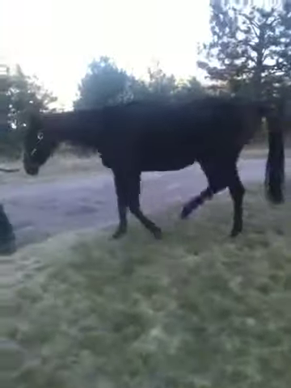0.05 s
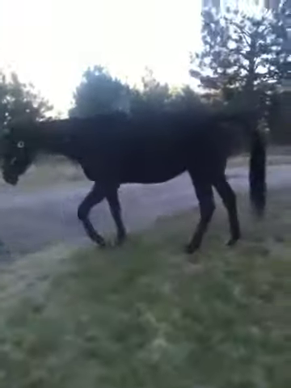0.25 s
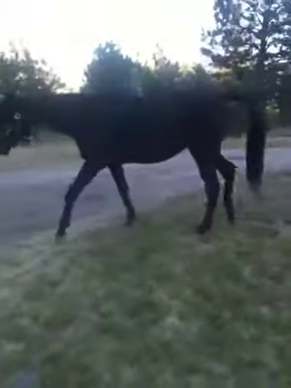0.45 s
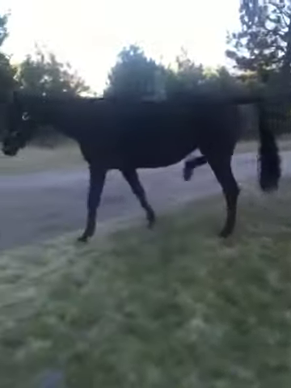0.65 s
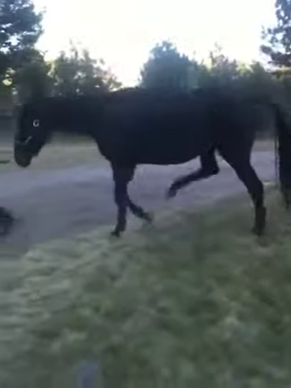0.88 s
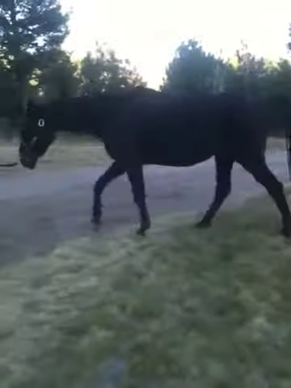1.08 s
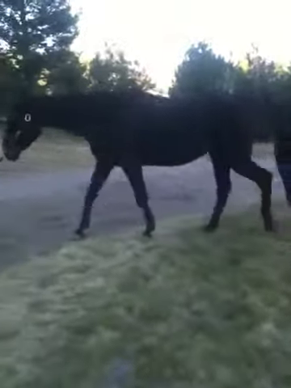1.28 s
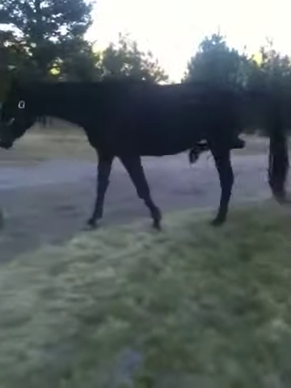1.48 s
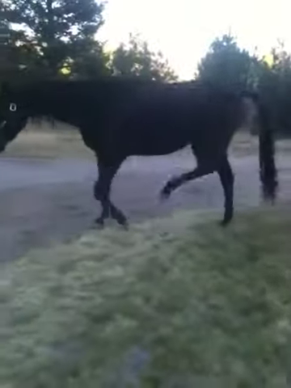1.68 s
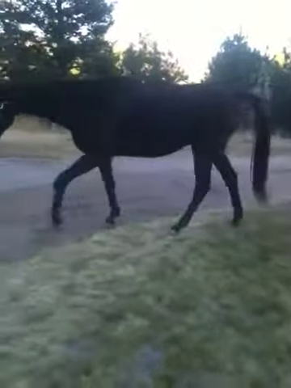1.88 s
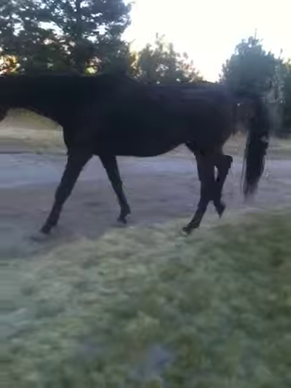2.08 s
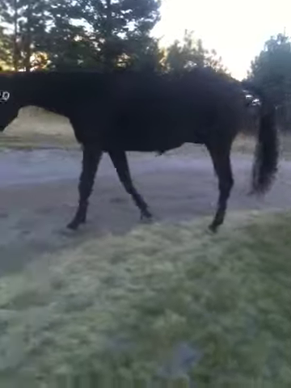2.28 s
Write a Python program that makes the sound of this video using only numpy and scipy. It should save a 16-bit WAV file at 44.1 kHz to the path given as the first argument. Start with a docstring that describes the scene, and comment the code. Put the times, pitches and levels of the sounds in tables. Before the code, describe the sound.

Dull handling bumps and creaks on the microphone, with a horse's faint hoof steps on dirt.

```python
"""Horse on a dirt track

A horse walks by a few metres from the microphone, its hooves crunching faintly in the dirt.
Much closer, the hand holding the camera bumps and creaks on the case, which gives a dull low ring.
Under it lie light wind, microphone hiss, a thin electrical whine and tiny regular ticks."""
import sys
import numpy as np
from scipy import signal
from scipy.fft import rfft, irfft
from scipy.io import wavfile
from scipy.ndimage import uniform_filter1d

SR = 44100
rng = np.random.default_rng(int(sys.argv[2]) if len(sys.argv) > 2 else 0)


def wrap_up_sound(samples):
    """Save the sound to the file named by the first command line argument, as 16-bit audio."""
    columns = np.atleast_2d(samples).T
    # keep every value between -1 and 1, then stretch to whole-number steps
    tamed = np.clip(columns, -1, 1)
    steps = np.round(tamed * 32767).astype(np.int16)
    wavfile.write(sys.argv[1], SR, steps)


N = 108045

# Hoof falls, scuffs and kicked grit on the track, a few metres off. Each row: time of the peak and
# decay time in seconds, thud level and grit level in dB, treble edge of the grit in Hz.
HOOF_FALLS = [(0.5811, 0.0012, -50, -53, 1720), (.5878, 0.0012, -42, -59, 2700),
              (0.81, 0.022, -73.5, -78, 3500), (0.852, 0.021, -93, -76.5, 4500),
              (0.937, 0.0091, -69, -75, 3550), (1.257, .004, -63, -67, 5000),
              (1.272, 0.0086, -69, -66.5, 4500), (1.278, .03, -75.5, -77, 4530),
              (1.485, 0.0063, -66.5, -69.5, 4500), (1.501, 0.015, -73, -76, 4500),
              (1.579, 0.0023, -64, -71, 3000), (1.876, 0.0082, -61.5, -67.5, 5560),
              (1.942, 0.0066, -78, -70, 4000), (2.138, 0.0051, -65.5, -68, 4500),
              (2.149, 0.0081, -53.5, -71.5, 4000), (2.23, 0.0035, -77, -64, 4000)]
# The hollow thud and the loose grit underfoot. Each row: frequency in Hz, relative level in dB.
THUD_SPECTRUM = [(100, -23), (180, 0), (290, 5), (400, -8), (540, 0.5), (700, 3), (950, -19), (1250, -5.5),
                 (1900, -31.5), (4000, -42)]
GRIT_SPECTRUM = [(400, 14), (1300, 2.5), (2800, 2), (4500, 0.5), (7000, -5.5), (14000, -13)]


def hooves(grain_samples=32, grain_spread_db=6, earth_hz=262, earth_db=-1.5, rise_share=0.86):
    """Each hoof presses into the dirt: the packed earth thuds and rings, and uneven grains crunch."""
    t, out = np.arange(N) / SR, np.zeros(N)
    grain_sizes = undb(grain_spread_db * rng.standard_normal(N // grain_samples + 1))
    grains = np.repeat(grain_sizes, grain_samples)[:N]
    thud = colour(rng.standard_normal(N), THUD_SPECTRUM)
    crunch = colour(grains * rng.standard_normal(N), GRIT_SPECTRUM)
    earth_ring = undb(earth_db) * np.sin(2 * np.pi * earth_hz * t)
    for at, decay_s, thud_db, grit_db, edge_hz in HOOF_FALLS:
        age = (t - at) / decay_s
        press = np.exp(-np.where(age < 0, age / rise_share, age) ** 2)
        out += press * (undb(thud_db) * (thud + earth_ring) + undb(grit_db) * dull(crunch, edge_hz))
    return out


# Sharp clicks out on the track, likely stones struck by a hoof.
# Each row: start in seconds, peak level in dB, centre frequency in Hz.
STONE_CLICKS = [(.5876, -54, 1640), (1.8761, -57, 4160), (2.2312, -64, 2600)]


def stones(width_octaves=0.97):
    """A hard contact gives one very short, dry click."""
    out, half_band = np.zeros(N), 2 ** (width_octaves / 2)
    for at, db, hz in STONE_CLICKS:
        band = signal.butter(2, [hz / half_band, hz * half_band], "band", fs=SR, output="sos")
        click = signal.sosfilt(band, signal.unit_impulse(512))
        add(out, undb(db) * click / np.abs(click).max(), at)
    return out


CASE_LOW_HZ, CASE_UPPER_HZ = 146.2, 214.7  # the usual resonances of the camera case


def case_ring(upper_hz, edge_hz):
    """A push rings two damped resonances of the case; soft skin takes the treble off. Peak 1."""
    s = 1j * np.fft.rfftfreq(2048, 1 / SR)

    def pole(hz, q):
        return 1 / (1 + s / (hz * q) + (s / hz) ** 2)

    low_hz = CASE_LOW_HZ * (upper_hz / CASE_UPPER_HZ) ** 0.73  # partly follows the upper ring
    case = -s ** 2 * pole(low_hz, q=2.43) * pole(upper_hz, q=2.48)
    skin = pole(edge_hz, q=0.88) ** 2
    ring = irfft(case * skin)
    return ring / np.abs(ring).max()


# Knocks of the hand, right at the microphone.
# Each row: start in seconds, peak level in dB, upper ring and treble edge in Hz.
HAND_BUMPS = [(0.0409, -54, 280, 684), (0.3677, -30, 196, 400), (.5800, -30, 264, 640),
              (0.5862, -32, 188, 580), (0.5939, -31, 180, 397), (0.8631, -38.5, 205, 425),
              (0.908, -35, 254, 414), (0.9184, -43.5, 202, 440), (0.9385, -35, 230, 463),
              (1.014, -39.5, 208, 475), (1.124, -56, 104, 400), (1.1797, -38, 203, 460),
              (1.2106, -38.5, 287, 1050), (1.336, -43, 203, 410), (1.4114, -35, 224, 418),
              (1.678, -52.5, 198, 650), (1.878, -36.5, 280, 670), (2.3103, -48, 151, 740),
              (2.3906, -49, 154, 744)]


def hand_bumps():
    """Each bump of the hand rings the case once."""
    out = np.zeros(N)
    for at, db, upper_hz, edge_hz in HAND_BUMPS:
        add(out, undb(db) * case_ring(upper_hz, edge_hz), at)
    return out


# The grip shifting on the case, right at the microphone. Each row: start and length in seconds,
# base level in dB, slips per second, upper ring and treble edge in Hz.
GRIP_CREAKS = [(.008, .025, -63.5, 90, 213, 553), (0.106, 0.024, -46.5, 55, 230, 920),
               (0.2, 0.06, -49, 79, 183, 573), (0.24, .019, -39.5, 69.6, 210, 426),
               (.3330, .008, -43.5, 44, 226, 950), (0.348, 0.013, -40, 152, 260, 443),
               (0.398, 0.042, -38.5, 94.6, 213, 496), (0.4452, .018, -45, 111, 233, 580),
               (.468, 0.019, -60, 134, 204, 550), (0.519, 0.015, -37, 102, 184, 434),
               (0.543, 0.032, -30.5, 62, 184, 406), (.625, 0.027, -60.5, 56, 195, 400),
               (0.731, 0.048, -50, 85, 223, 596), (0.882, .025, -48.5, 102, 229, 430),
               (0.9862, 0.024, -45.5, 78, 241, 766), (1.0259, 0.043, -42.5, 73.3, 232, 506),
               (1.0778, 0.051, -56.5, 81, 175, 477), (1.1993, .008, -41.5, 90, 199, 484),
               (1.225, 0.02, -40.5, 112, 211, 640), (1.258, 0.035, -58.5, 88, 190, 500),
               (1.4236, .043, -41.5, 130, 190, 427), (1.59, 0.038, -53.5, 110, 213, 604),
               (1.655, 0.04, -52, 52.7, 241, 760), (1.804, .008, -56, 54, 210, 500),
               (1.84, 0.047, -52, 101, 256, 854), (1.8887, 0.031, -40, 93.5, 220, 870),
               (1.9463, .041, -44, 64, 189, 447), (2.0077, 0.034, -47.5, 75, 216, 654),
               (2.295, 0.045, -50.5, 68, 202, 780), (2.355, 0.015, -56, 80, 168, 650),
               (2.3855, 0.012, -44.5, 168, 230, 890), (2.402, 0.05, -49.5, 108, 238, 650)]


def grip_creaks(max_slips=16, period_jitter=0.0838, spread_db=1.78, catch_db=-11.5):
    """Skin sticks and slips on the case, with a weaker, higher catch between slips."""
    out = np.zeros(N)
    for start, length, base_db, rate, upper_hz, edge_hz in GRIP_CREAKS:
        slip = case_ring(upper_hz, edge_hz)
        catch = undb(catch_db) * case_ring(1.204 * upper_hz, edge_hz)
        age = 0
        for lateness, strength, catch_size, catch_place in rng.standard_normal((max_slips, 4)):
            if age >= length:
                break
            lift_db = 2 - age / length  # sags by 1 dB over the creak
            gain = undb(base_db + lift_db + spread_db * strength)
            add(out, gain * slip, start + age)
            add(out, gain * catch_size * catch, start + age + (catch_place % 1) / rate)
            age += np.exp(period_jitter * lateness) / rate
    return out


def grip_tremor(slips_per_s=85, level_db=-68):
    """Tiny random slips of the hand keep the case faintly ringing."""
    slips = (rng.random(N) < slips_per_s / SR) * rng.standard_normal(N)
    return undb(level_db) * signal.fftconvolve(slips, case_ring(CASE_UPPER_HZ, edge_hz=600))[:N]


# Light wind over the track. Each row: frequency in Hz, relative level in dB.
WIND_SPECTRUM = [(20, -35), (45, -20), (80, 1.5), (180, 1.5), (300, -16), (500, -17), (1000, -29),
                 (2500, -38.5)]


def wind(level_db=-68.5, gust_db=2):
    """A low, gently gusting rush of air."""
    gusts = undb(level_db + gust_db * drift(rate_hz=6.34))
    return gusts * colour(rng.standard_normal(N), WIND_SPECTRUM)


# Radio interference inside the camera.
# Each row: frequency in Hz, starting level in dB, time to fall by 60 dB in milliseconds.
TICK_TONES = [(4100, -77, 0.6), (9300, -59.5, 1.3)]


def interference_ticks(first_s=0.0358, period_s=0.1024):
    """Interference makes tiny regular ticks, each a pair of tones that die at once."""
    age = (np.arange(N) / SR - first_s) % period_s
    out = np.zeros(N)
    for hz, db, t60_ms in TICK_TONES:
        decay = undb(-60 * age * 1000 / t60_ms)
        out += undb(db) * decay * np.sin(2 * np.pi * hz * age)
    return out


def electrical_whine(hz=15000, level_db=-82.5, flips_per_s=60, sharpness=13):
    """A thin, high tone from the electronics keeps flipping its sign."""
    t = np.arange(N) / SR
    flips = np.tanh(sharpness * np.sin(np.pi * flips_per_s * t))
    return np.sqrt(2) * undb(level_db) * flips * np.sin(2 * np.pi * hz * t)


# The noise floor of the microphone. Each row: frequency in Hz, relative level in dB.
HISS_SPECTRUM = [(100, -10.5), (700, 4.5), (1300, 0), (2500, -2), (5000, -3.5), (10000, -4), (15500, -6.5)]


def microphone_hiss(level_db=-74.5):
    """The microphone adds an even hiss of its own."""
    return undb(level_db) * colour(rng.standard_normal(N), HISS_SPECTRUM)


def undb(db):
    """Decibels to gain."""
    return 10 ** (np.asarray(db) / 20)


def colour(x, points):
    """Shape x by a spectrum of (Hz, dB) points, at rms 1."""
    hz, db = np.array(points).T
    bins_hz = np.maximum(np.fft.rfftfreq(N, 1 / SR), 1)
    gain = undb(np.interp(np.log(bins_hz), np.log(hz), db))
    y = irfft(rfft(x) * gain, N)
    return y / y.std()


def dull(x, edge_hz):
    """Low-pass, at rms 1."""
    y = signal.sosfilt(signal.butter(4, edge_hz, fs=SR, output="sos"), x)
    return y / y.std()


def drift(rate_hz):
    """Slow random drift with a spread of 1."""
    hold = int(SR / rate_hz)
    steps = np.repeat(rng.standard_normal(N // hold + 1), hold)
    y = uniform_filter1d(uniform_filter1d(steps, hold), hold)[:N]
    return y / y.std()


def add(out, sound, at_s):
    """Mix a sound in at a time."""
    i = int(np.clip(at_s * SR, 0, N))
    out[i:i + len(sound)] += sound[:N - i]


def scene():
    """Horse, hand and background at one hand-held microphone by the track."""
    hand = hand_bumps() + grip_creaks() + grip_tremor()
    horse = hooves() + stones()
    background = wind() + interference_ticks() + electrical_whine() + microphone_hiss()
    return (horse + hand + background)[None]


def record(dry, low_cut_hz=42, top_hz=15650):
    """The recorder thins the deepest bass and cuts the top steeply."""
    thinned = signal.sosfilt(signal.butter(2, low_cut_hz, "high", fs=SR, output="sos"), dry)
    return signal.sosfilt(signal.ellip(12, .1, 70, top_hz, fs=SR, output="sos"), thinned)


dry = scene()
out = record(dry)
wrap_up_sound(out)
```